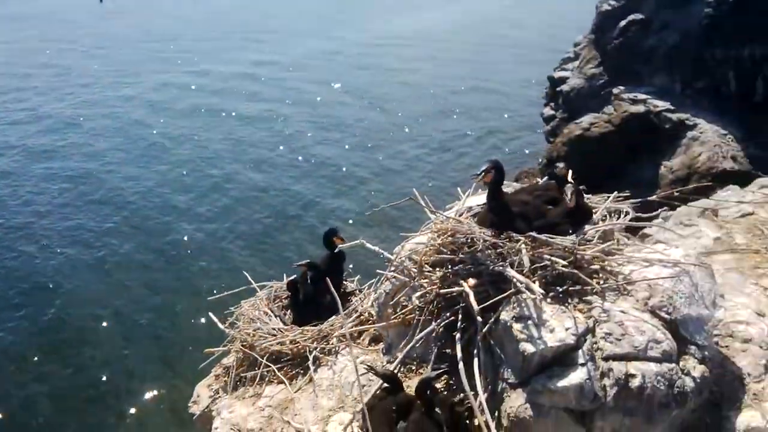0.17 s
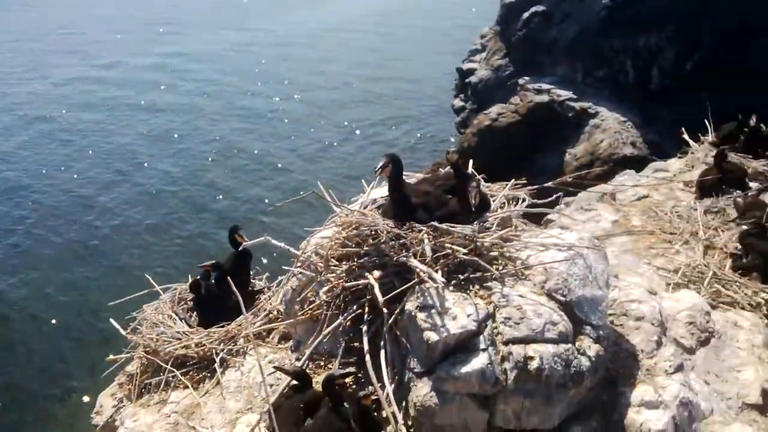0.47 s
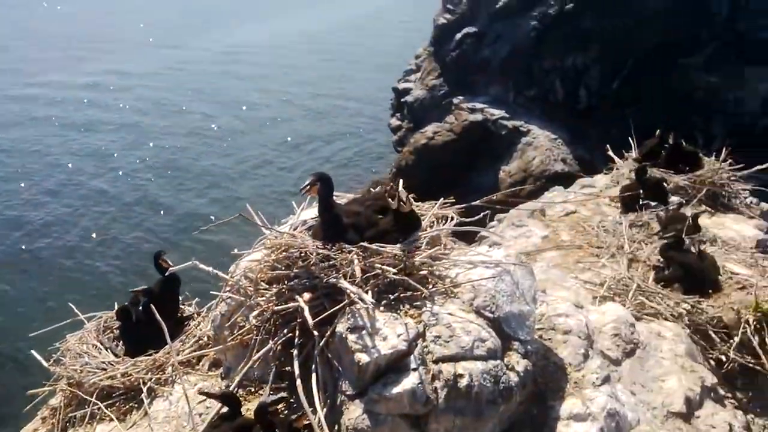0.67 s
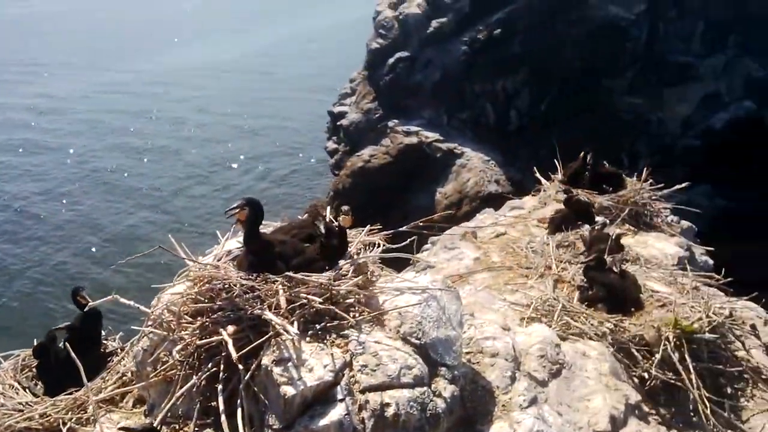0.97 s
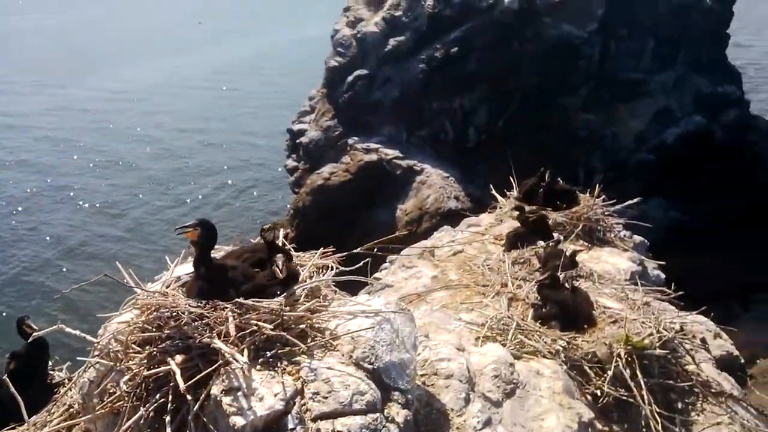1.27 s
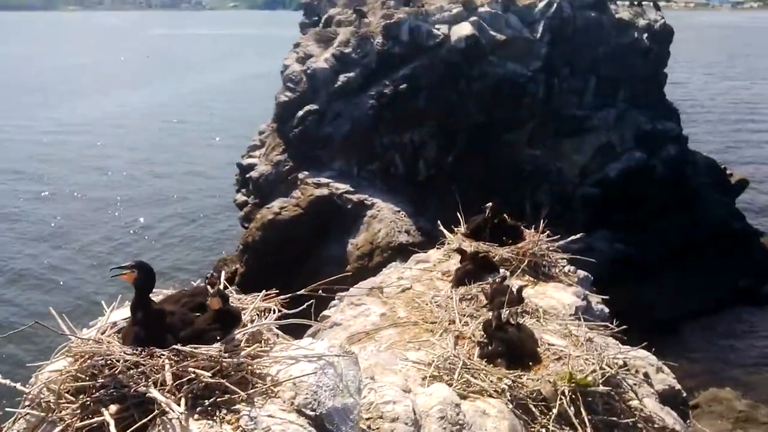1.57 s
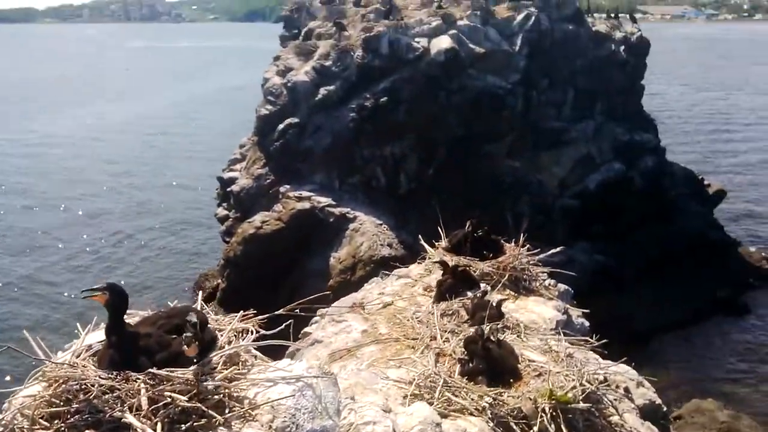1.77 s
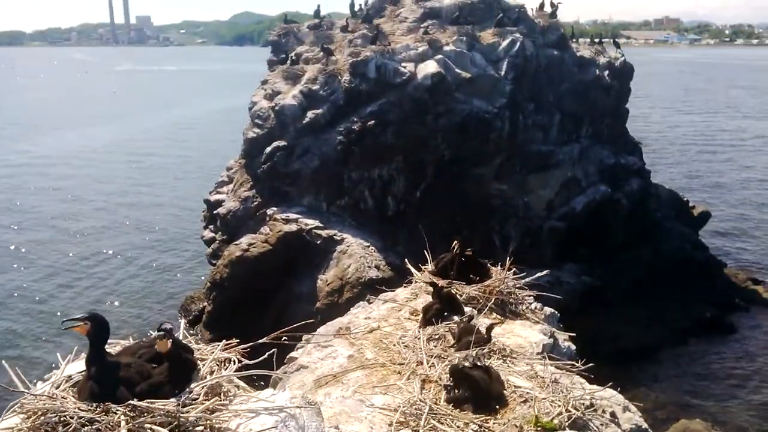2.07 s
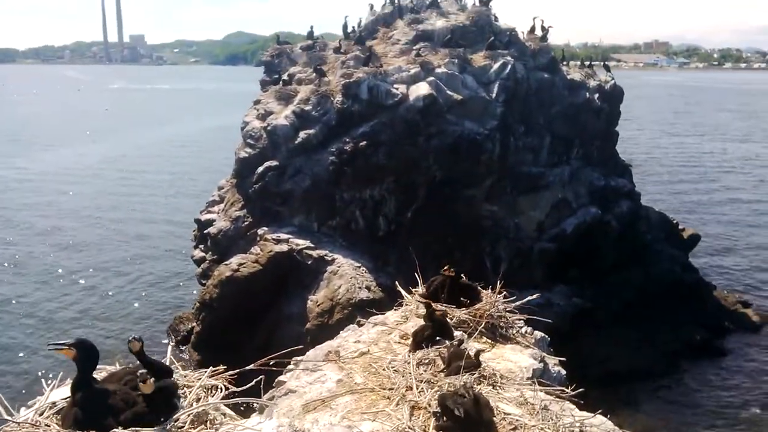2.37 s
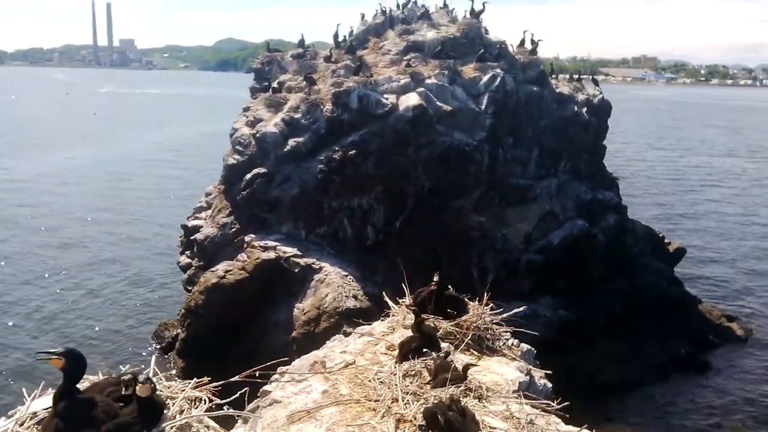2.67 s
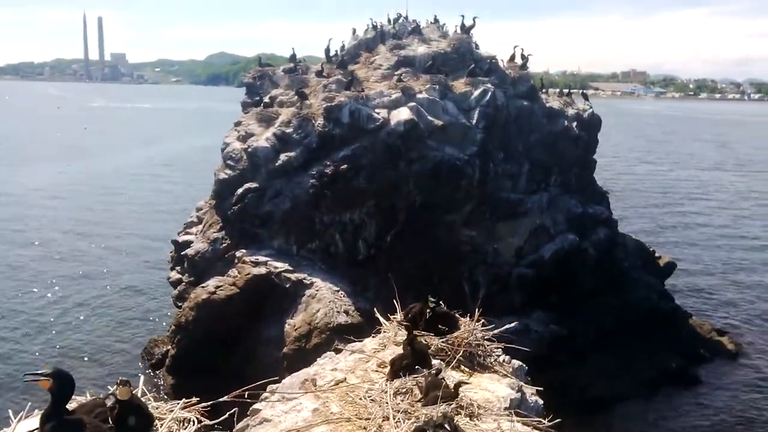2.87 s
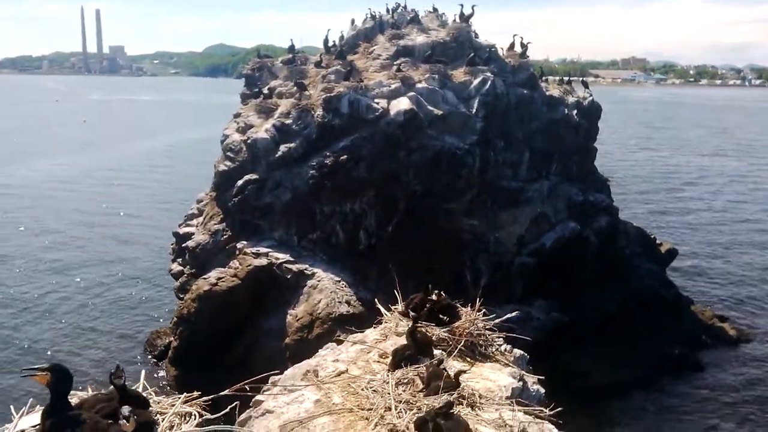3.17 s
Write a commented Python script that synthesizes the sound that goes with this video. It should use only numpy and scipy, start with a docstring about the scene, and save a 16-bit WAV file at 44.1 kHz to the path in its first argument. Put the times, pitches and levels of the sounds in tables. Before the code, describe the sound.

Gulls call continuously in a colony on a coastal rock, clear wailing mews overlapping harsh rasps, short yelps and thin squeaks. Farther birds croak behind the close voices, with a slight cliff echo and soft sea wash.

```python
"""Seabird colony on a coastal rock

Gulls mew, rasp and yelp over each other, each voice a gliding harmonic tone made harsh by jitter
and a fast flutter. Thin squeaks and hoarse whistles slide above them, farther birds call at random,
and the cliff gives a short echo. Underneath lie a wash of sea, a faint low hum and one puff of wind."""
import sys
import numpy as np
from scipy import signal
from scipy.fft import rfft, irfft, next_fast_len
from scipy.io import wavfile

SR = 44100
rng = np.random.default_rng(int(sys.argv[2]) if len(sys.argv) > 2 else 0)


def persist_wave(psi):
    """Save psi, clipped to +-1, as 16-bit WAV."""
    counts = np.round(np.clip(psi, -1, 1) * 32767).astype(np.int16)
    wavfile.write(sys.argv[1], SR, np.atleast_2d(counts).T)


N = 146853
TOP_HZ = 15700

# Throat colour on the overtones of a mew: freq_hz, gain_db
MEW_THROAT = [(3300, 9.5), (4300, -5.5), (4850, -2), (6400, 1), (8200, -15), (10000, -7), (12000, -25),
              (15500, -45)]
# Mew contours, one list of breakpoints per call: time_s, pitch_hz, fundamental_db, overtone_drive_db
MEW_CONTOURS = [
    [(0.23, 1680, -22.5, -52), (0.32, 1678, -43, -45.5), (0.385, 1910, -39, -61.5),
     (0.41, 1680, -26, -42.5), (0.45, 1590, -21.5, -37), (0.5, 1573, -20.5, -38.5), (0.55, 1637, -24, -42),
     (0.575, 2020, -71, -36), (0.6, 2230, -55, -43), (0.63, 1698, -58, -44.5), (0.66, 1520, -35, -66)],
    [(0.9, 1720, -39, -43), (0.95, 1753, -25, -42), (1.005, 1779, -33.5, -44), (1.045, 1642, -22.5, -45.5),
     (1.125, 1692, -23.5, -42.5), (1.17, 1739, -42, -42), (1.23, 1638, -33, -55)],
    [(1.51, 1750, -28, -44.5), (1.58, 1686, -39, -52.5), (1.69, 1632, -24.5, -47), (1.755, 1593, -22, -50),
     (1.87, 1746, -41, -44), (1.93, 1604, -31, -56)],
    [(2.28, 1728, -31, -58), (2.35, 1697, -21, -67), (2.365, 1683, -40, -67), (2.415, 1742, -27, -51.5),
     (2.48, 1686, -20.5, -43), (2.555, 1707, -30, -38), (2.61, 1470, -25, -60)],
    [(2.88, 1546, -32, -53), (2.98, 1627, -35, -48), (3.02, 1554, -35.5, -38), (3.045, 1660, -24.5, -57),
     (3.09, 1548, -32, -38), (3.13, 1594, -25.5, -43.5), (3.175, 1658, -24.5, -39),
     (3.25, 1614, -27, -42.5)],
]


def mews():
    """Clear, wailing gull calls with only a trace of grit."""
    return long_calls(MEW_CONTOURS, MEW_THROAT, rough=.14)


# Throat colour on the overtones of a rasp: freq_hz, gain_db
RASP_THROAT = [(2700, -2), (4100, -7), (5300, -11), (7500, -9.5), (12000, -27), (15500, -31)]
# Rasp contours, one list of breakpoints per call: time_s, pitch_hz, fundamental_db, overtone_drive_db
RASP_CONTOURS = [
    [(0, 1439, -32.5, -42.5), (0.16, 1215, -25.5, -38.5), (0.25, 1242, -34, -45.5), (0.37, 1285, -42, -43)],
    [(0.4, 1141, -25, -34.5), (0.475, 1466, -22, -27), (0.51, 1335, -24, -28.5), (0.59, 1265, -50, -56)],
    [(0.68, 1370, -51, -47), (0.78, 1414, -28.5, -37), (0.84, 1315, -29, -44)],
    [(0.86, 1139, -25, -34.5), (0.9, 1377, -24, -27.5), (0.95, 1179, -28, -33.5), (1.03, 1020, -70, -41)],
    [(1.02, 1240, -41.5, -52), (1.25, 1414, -34, -48.5), (1.37, 1415, -47, -40), (1.46, 1244, -31, -63)],
    [(1.49, 1078, -45, -49.5), (1.57, 1104, -68, -36), (1.74, 1252, -59, -44), (1.83, 1401, -53, -34.5),
     (1.95, 1328, -59, -28.5), (2.01, 1185, -25.5, -39)],
    [(2.4, 1290, -56, -37), (2.47, 1418, -65, -33.5), (2.58, 1368, -38, -33.5), (2.645, 1106, -32, -44.5)],
    [(2.84, 1243, -38, -43.5), (3.0, 1416, -37, -36.5), (3.13, 1369, -66, -37.5), (3.2, 1272, -46, -49.5),
     (3.33, 1421, -34.5, -39.5)],
]


def rasps():
    """Lower gull calls, harsh with heavy jitter and flutter."""
    return long_calls(RASP_CONTOURS, RASP_THROAT, rough=.65)


def long_calls(contours, throat, rough):
    """Glides that brighten as the bill opens; pushed high, the overtones thin to an octave whistle."""
    flip_hz, fade_db_per_hz = 1770, .07
    out = np.zeros(N)
    for contour in contours:
        times, *columns = np.array(contour).T
        t = np.arange(times[0], times[-1], 1 / SR)
        hz, fundamental_db, drive_db = (np.interp(t, times, c) for c in columns)
        phase, envelope = syrinx(hz, rough)
        octave = colour(2 * hz, throat) * partial(phase, 2, rough)
        upper_gain = undb(-fade_db_per_hz * np.maximum(hz - flip_hz, 0))
        upper = upper_gain * harmonics(phase, hz, rough, throat, lowest=3)
        fundamental = undb(fundamental_db) * partial(phase, 1, rough)
        overtones = undb(drive_db) * (octave + upper)
        add(out, times[0], (fundamental + overtones) * envelope)
    return out


# Dark throat colour of a yelp: freq_hz, gain_db
YELP_THROAT = [(2000, 0), (2700, -23), (7000, -37), (15500, -70)]
# Yelps and croaks: start_s, length_s, from_hz, to_hz, base_level_db, roughness
YELP_NOTES = [(0, 0.022, 1900, 1694, -31, 0), (.336, 0.011, 1440, 1160, -21.5, 0),
              (.631, 0.024, 1704, 1470, -27.5, 0), (0.719, 0.14, 1407, 1306, -37.5, 0.94),
              (0.869, 0.02, 1182, 1334, -27, 0.04), (1.186, 0.04, 1692, 1600, -34.5, 0.3),
              (1.367, 0.015, 1590, 1104, -23.5, .25), (1.383, 0.079, 1880, 1742, -34, 0.29),
              (1.755, 0.031, 1378, 1502, -24, 0.2), (1.913, 0.031, 1625, 1564, -30.5, 0.1),
              (1.999, 0.155, 1304, 1382, -37.5, 0.88), (2.229, 0.052, 1504, 1579, -25, 0.13),
              (2.358, 0.053, 1481, 1452, -22, 0), (2.618, 0.02, 2084, 1280, -31.5, 0.3),
              (2.69, 0.12, 1318, 1316, -34.5, 0.69), (3.15, 0.019, 1450, 1420, -24, 0.2),
              (3.178, 0.0925, 1053, 882, -48, 0.42)]


def yelps():
    """Short notes that slide in pitch and swell, nearly all fundamental."""
    out = np.zeros(N)
    for start, length, from_hz, to_hz, base_db, rough in YELP_NOTES:
        hz = np.linspace(from_hz, to_hz, int(length * SR))
        swell_db = np.linspace(5.5, 11, len(hz))
        phase, envelope = croak(hz, rough)
        tone = harmonics(phase, hz, rough, YELP_THROAT)
        add(out, start, undb(base_db + swell_db) * envelope * tone)
    return out


# Squeaks and whistles: start_s, length_s, nominal_from_hz, nominal_to_hz, level_db, roughness
SQUEAK_NOTES = [(0.139, .05, 2550, 2340, -29, 0.83), (0.183, 0.043, 7200, 6940, -40.5, 0.2),
                (0.321, 0.092, 5350, 5740, -39, 0.6), (0.353, 0.046, 7000, 7430, -36, 0.25),
                (0.688, 0.036, 2400, 2390, -32, 0.75), (1.558, 0.085, 2150, 2410, -31.5, 0.4),
                (1.668, 0.12, 5050, 4940, -39, 1.1), (2.226, 0.19, 5450, 4660, -41, 0.67),
                (2.352, 0.085, 4400, 4930, -41, 0.9), (2.898, 0.026, 8400, 7700, -37, 0.8),
                (2.959, 0.019, 5300, 4750, -36.5, 0.5), (3.001, 0.053, 4800, 5230, -39, 1),
                (3.09, .025, 5150, 4400, -43, 0.4), (3.096, 0.083, 2850, 2630, -32.5, .2)]


def squeaks():
    """High single-tone slides, thin and clear to hoarse, sounding 2% under their nominal pitch."""
    out = np.zeros(N)
    for start, length, from_hz, to_hz, db, rough in SQUEAK_NOTES:
        hz = np.linspace(from_hz, to_hz, int(length * SR))
        phase, envelope = croak(hz, rough)
        add(out, start, undb(db) * envelope * partial(phase, 0.98, rough))
    return out


FLUTTER_HZ, ATTACK_S, RELEASE_S = 188.6, 0.003, 0.011


def syrinx(hz, rough):
    """Phase and envelope from the bird's voice organ; rough voices flutter fast and stutter unevenly."""
    n = len(hz)
    t = np.arange(n) / SR
    waver = 1 + 0.0053 * (1 + 2 * rough) * walk(n, 60.33)
    phase = phase_of(hz * waver)
    flutter_hz = FLUTTER_HZ * (1 + 0.212 * walk(n, 48.56))
    flutter = 1 + rough * 0.46 * np.sin(phase_of(flutter_hz))
    stutter = undb(rough * 7.5 * np.tanh(walk(n, 141.6)))
    fades = np.clip(t / ATTACK_S, 0, 1) * np.clip((t[-1] - t) / RELEASE_S, 0, 1)
    return phase, unit(flutter * stutter) * fades


def croak(hz, rough):
    """A syrinx whose vibration keeps slipping out of step."""
    phase, envelope = syrinx(hz, rough)
    slip_rad = rough * .85 * walk(len(hz), FLUTTER_HZ)
    return phase + slip_rad, envelope


def harmonics(phase, hz, rough, throat, lowest=1, highest=11):
    """A harmonic stack coloured by the throat; each overtone shimmers on its own."""
    out = 0
    for k in range(lowest, min(int(TOP_HZ / hz.mean()), highest) + 1):
        shimmer_db = 4 * min((k - 1) / 3, 1) * walk(len(hz), 36)
        out = out + colour(k * hz, throat) * undb(shimmer_db) * partial(phase, k, rough)
    return out


def partial(phase, ratio, rough):
    """One partial; phase jitter smears it, and turns the high ones into a hoarse hiss."""
    jitter_rad = rough * .4 * ratio * walk(len(phase), 700)
    return np.sqrt(2) * np.sin(ratio * phase + jitter_rad)


# Colour of the distant voices: freq_hz, gain_db
FAR_THROAT = [(400, -16), (650, -14.5), (900, 1.5), (2100, 0.5), (3000, -12.5)]


def far_birds(base_hz, level_db, rough, calls, highest):
    """Arched croaks scattered around a base pitch; distance leaves only the lowest harmonics."""
    typical_s = .13
    out = np.zeros(N)
    for i, (nudge, pitch, length, strength, slide) in enumerate(rng.uniform(-1, 1, (calls, 5))):
        progress = np.linspace(0, 1, int(typical_s * (1 + 0.393 * length) * SR))
        arch = np.sin(np.pi * progress ** 0.691)
        hz = base_hz * np.exp(.35 * pitch + .15 * slide * progress) * (1 + .2 * arch)
        phase, envelope = croak(hz, rough)
        tone = harmonics(phase, hz, rough, FAR_THROAT, highest=highest)
        start = (i + nudge) / (calls - 1) * N / SR - typical_s / 2
        add(out, start, undb(2 * strength) * arch * envelope * tone)
    return undb(level_db) * unit(out)


def cliff_echo(x):
    """A short, dull scatter from the rock faces."""
    send_db, t60_s, predelay_s = -11, .09, .008
    t = np.arange(SR // 2) / SR
    tail = rng.standard_normal(len(t)) * undb(-60 * t / t60_s) * (t > predelay_s)
    tail /= np.sqrt(np.sum(tail ** 2))
    dull_tail = tint(tail, [(2000, 1.0), (10000, -3.5)])
    return undb(send_db) * signal.fftconvolve(x, dull_tail)[:N]


# Tone curve of the sea wash: freq_hz, gain_db
SEA_COLOUR = [(80, -8), (125, -16.5), (400, -12), (600, -13), (1400, 1), (3000, -17), (7000, -16),
              (15500, -33)]


def sea(level_db=-39.5):
    """A wash of noise that swells gently, by about a decibel."""
    wash = unit(tint(rng.standard_normal(N), SEA_COLOUR))
    return wash * undb(level_db + wobble(N, 1.5))


def hum(pitch_hz=177, level_db=-64.5):
    """A faint low tone, drifting slightly in pitch."""
    return undb(level_db) * np.sqrt(2) * np.sin(phase_of(pitch_hz + wobble(N, 4.4)))


# Wind puff: peak_s, half_width_s, level_db
WIND_PUFFS = [(.215, 0.03, -37.5)]


def wind():
    """A brief buffet of air: low rumble under a bell-shaped envelope."""
    t = np.arange(N) / SR
    envelope = sum(undb(db) * np.exp(-((t - peak) / width) ** 2) for peak, width, db in WIND_PUFFS)
    return wobble(N, 66) * envelope


def undb(db):
    """Decibels to gain."""
    return np.exp(np.asarray(db) * np.log(10) / 20)


def unit(x):
    """Scale to rms 1."""
    return x / np.sqrt(np.mean(x ** 2) + 1e-18)


def phase_of(hz):
    """Running phase of a moving frequency, in radians."""
    return 2 * np.pi * np.cumsum(hz) / SR


def colour(hz, curve):
    """Gain of a (freq_hz, gain_db) curve at these frequencies."""
    freqs, db = np.array(curve).T
    return undb(np.interp(np.log(hz + 1), np.log(freqs), db))


def tint(x, curve):
    """Equalise a sound with a (freq_hz, gain_db) curve."""
    return irfft(rfft(x) * colour(np.fft.rfftfreq(len(x), 1 / SR), curve), len(x))


def walk(n, hz):
    """Random modulation: straight lines through hz random values a second."""
    return np.interp(np.arange(n) * hz / SR, np.arange(512), rng.standard_normal(512))


def wobble(n, hz):
    """Smooth random modulation that rolls off around hz, rms about 1."""
    size = next_fast_len(n + 8192)
    rolloff = np.exp(-.5 * (np.fft.rfftfreq(size, 1 / SR) / hz) ** 2)
    return unit(irfft(rfft(rng.standard_normal(size)) * rolloff, size))[:n]


def add(out, start_s, x):
    """Mix a sound in at a time."""
    i = int(start_s * SR)
    x, i = x[max(-i, 0):], max(i, 0)
    out[i:i + len(x)] += x[:max(N - i, 0)]


def scene():
    """Near and far birds with their echo, over sea, hum and wind, in mono."""
    gulls = mews() + rasps()
    far_low = far_birds(base_hz=428.9, level_db=-36.5, rough=.26, calls=26, highest=6)
    far_mid = far_birds(base_hz=1302, level_db=-36, rough=.45, calls=64, highest=1)
    birds = gulls + yelps() + squeaks() + far_low + far_mid
    return (birds + cliff_echo(birds) + sea() + hum() + wind())[None]


def record(dry):
    """A steep low-pass takes off the very top."""
    return signal.sosfilt(signal.ellip(10, .2, 80, TOP_HZ, fs=SR, output="sos"), dry)


dry = scene()
out = record(dry)
persist_wave(out)
```